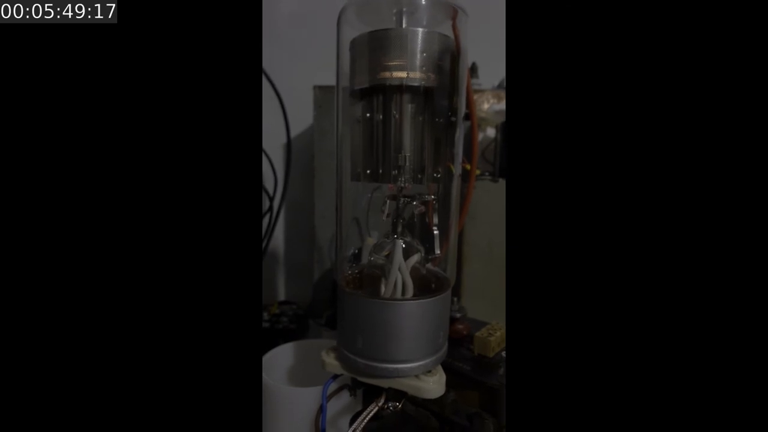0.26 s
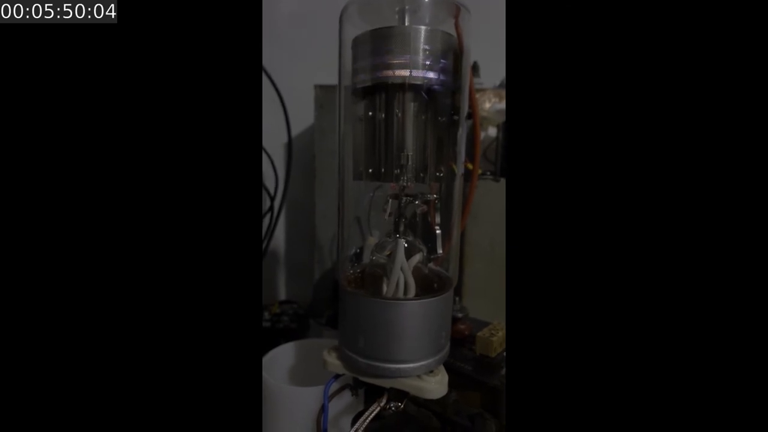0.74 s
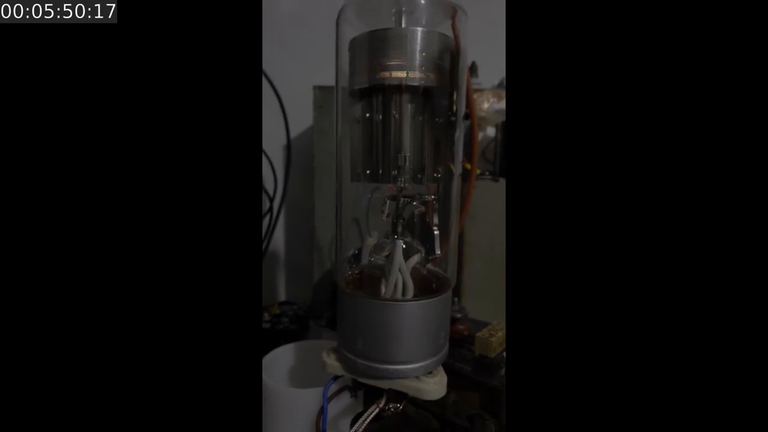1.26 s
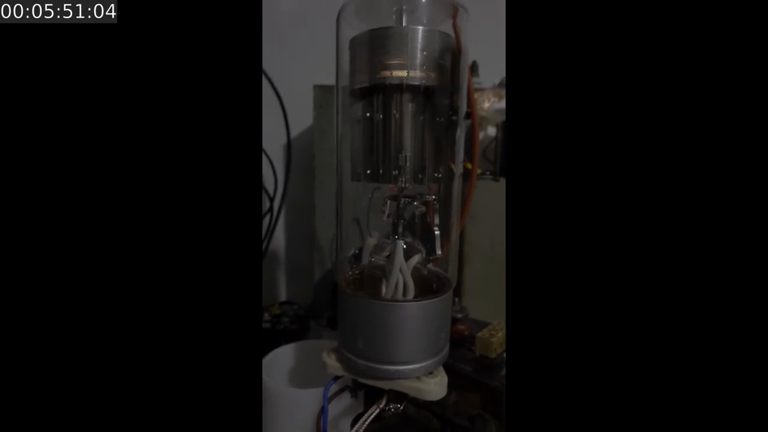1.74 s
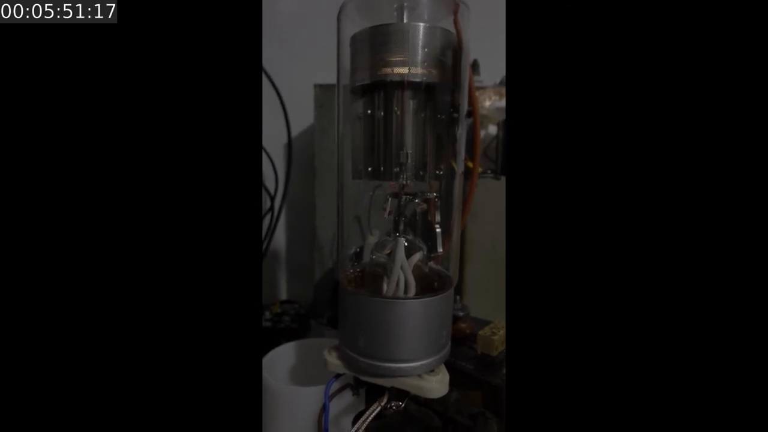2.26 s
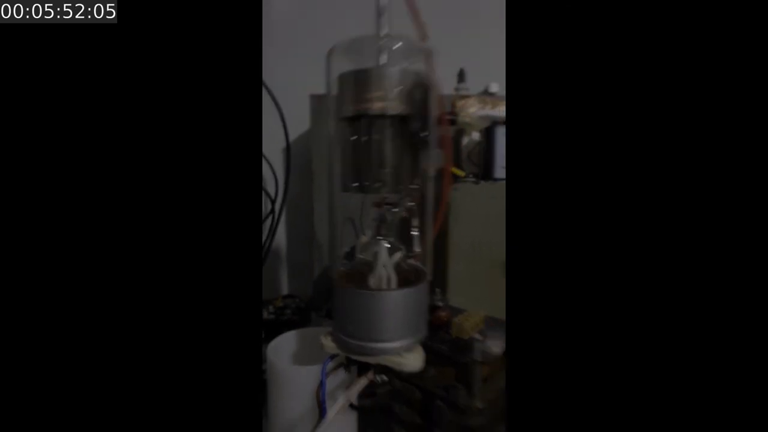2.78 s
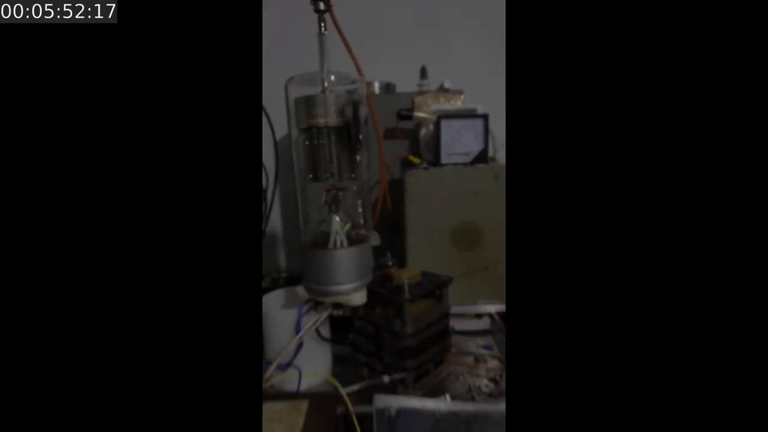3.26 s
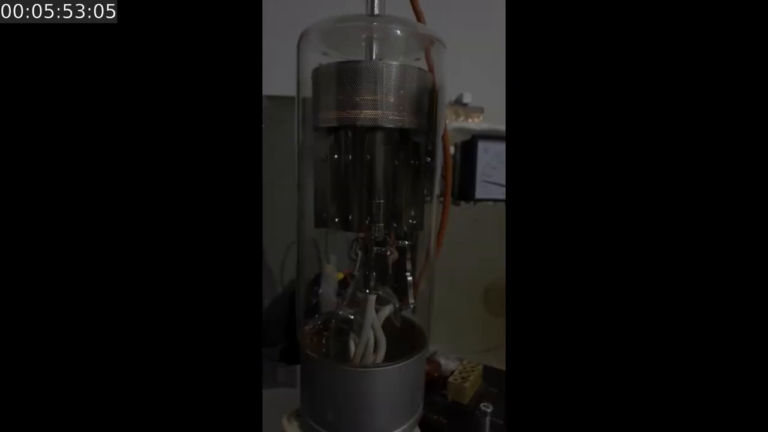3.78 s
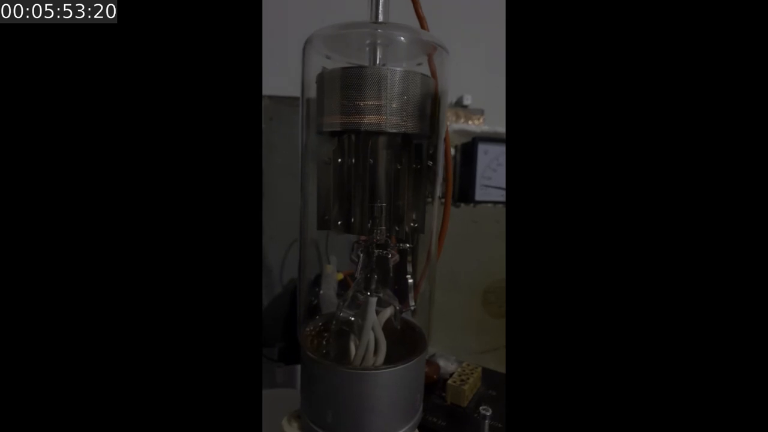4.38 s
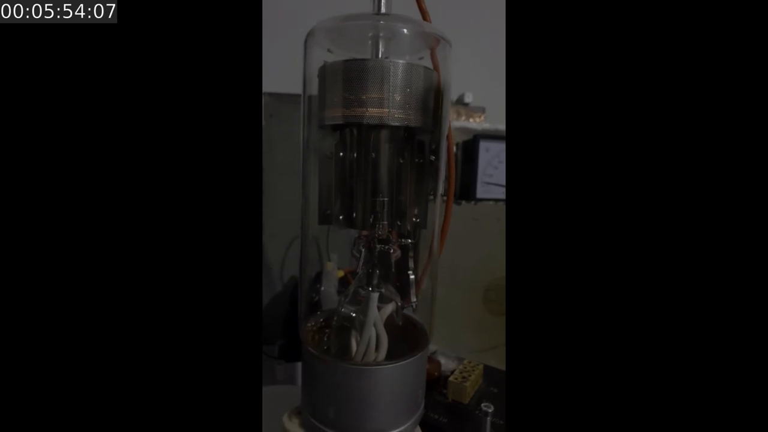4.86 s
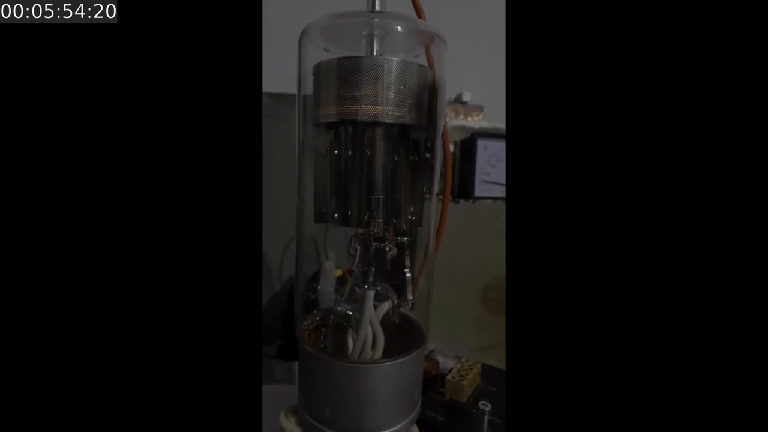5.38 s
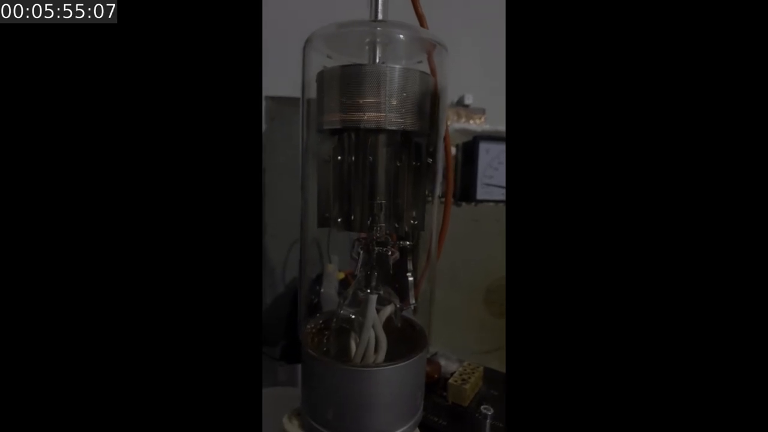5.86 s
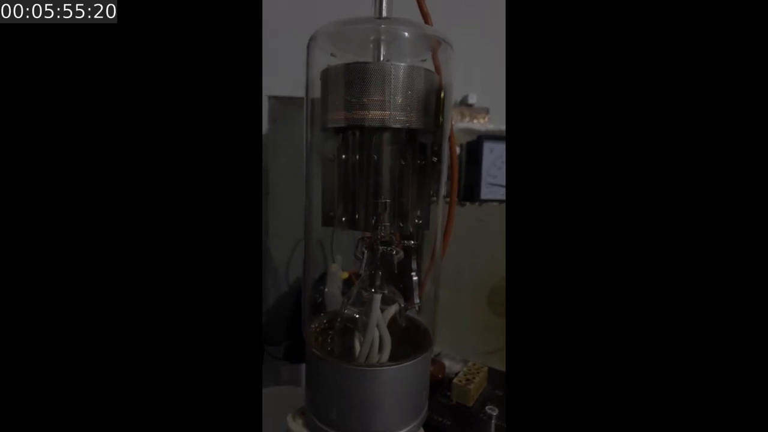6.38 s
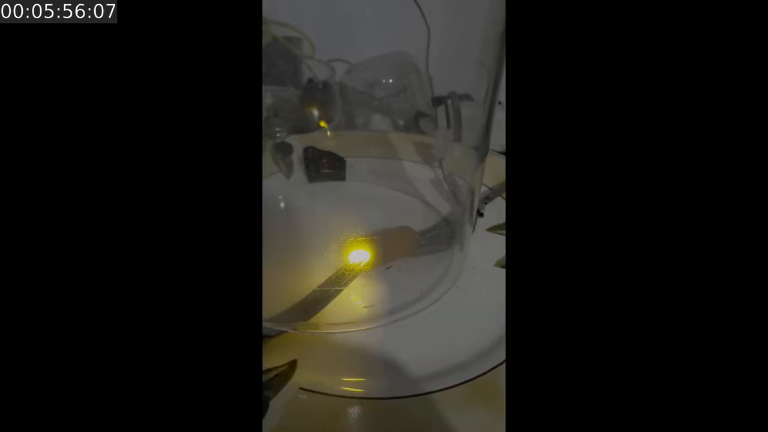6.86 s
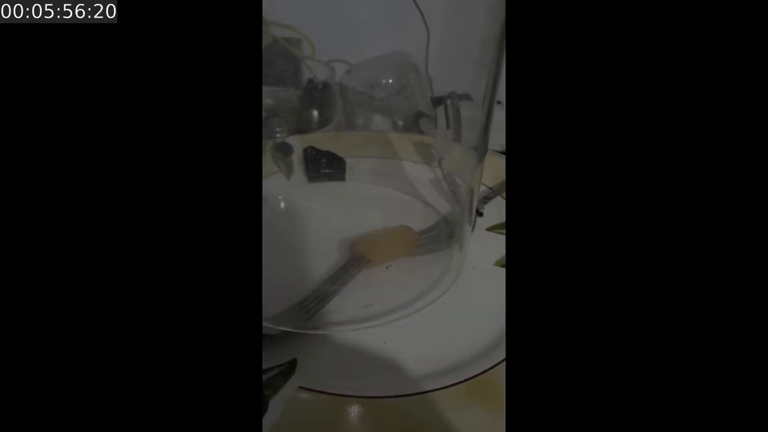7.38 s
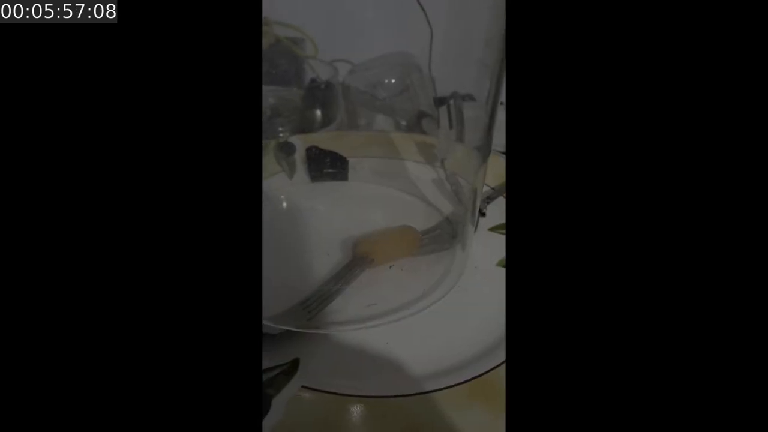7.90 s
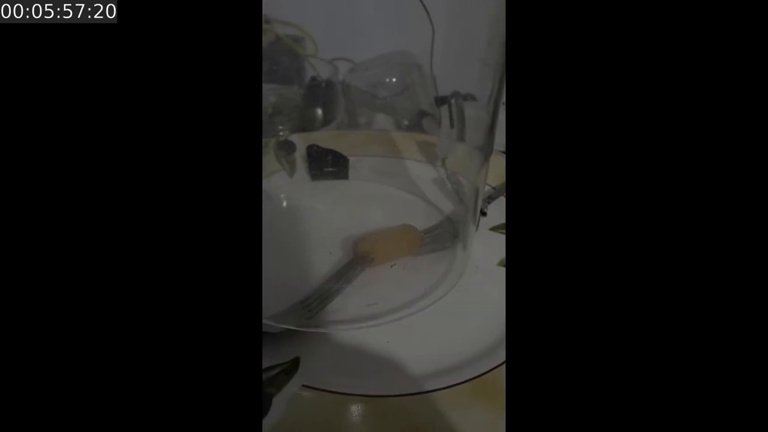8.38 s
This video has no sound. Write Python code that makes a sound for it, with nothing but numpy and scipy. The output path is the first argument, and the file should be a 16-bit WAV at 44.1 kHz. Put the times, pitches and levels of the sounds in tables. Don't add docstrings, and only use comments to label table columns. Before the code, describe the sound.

Steady fan hiss and transformer hum with wind buffeting and finger knocks on a handheld phone, broken by two sharp electric snaps after level drops.

```python
import sys
import numpy as np
from scipy import signal
from scipy.fft import rfft, irfft
from scipy.io import wavfile
from scipy.ndimage import uniform_filter1d

SR = 44100
rng = np.random.default_rng(int(sys.argv[2]) if len(sys.argv) > 2 else 0)


def digitize_waveform(pressure):
    field = np.atleast_2d(pressure).T
    bounded = np.clip(field, -1, 1)
    quanta = np.round(bounded * 32767).astype(np.int16)
    wavfile.write(sys.argv[1], SR, quanta)


def field_ratio(decibels):
    return 10 ** (np.asarray(decibels, dtype=float) / 20)


N = 381024

# (start [s], end [s], place [index])
STANDS = [
    (0, 2.72, 0),
    (2.72, 3.397, 2),
    (3.431, 6.349, 1),
    (6.4315, 9, 2),
]
# (time [s], colour [index], left [dB], right [dB], crackle [ms], tilt of the crack [dB per octave])
SNAPS = [
    (4.0719, 0, -28.5, -29, 10.6, -5),
    (6.8519, 1, -22.5, -32, 11, 0.5),
]
SLIP_START_S, SLIP_END_S = 2.9445, 2.972


def over_hz(table, hz, column):
    rows = np.array(table, float)
    return np.interp(np.log(hz + 1), np.log(rows[:, 0]), rows[:, column])


def unit(x):
    return x / np.sqrt(np.mean(x ** 2))


def walk(rate):
    k = int(SR / rate)
    steps = np.repeat(rng.standard_normal(N // k + 1), k)
    return unit(uniform_filter1d(uniform_filter1d(steps, k), k)[:N])


def bell(s, ms):
    coarse_t = np.arange(0, N, 16) / SR
    return np.repeat(np.exp(-((coarse_t - s) * 2000 / ms) ** 2), 16)[:N]


def port_gains(db, pan_db):
    return field_ratio(db) * np.array([[field_ratio(pan_db)], [1]]) / np.sqrt(1 + field_ratio(2 * pan_db))


def causal(table, tilt_db, size=4096):
    hz = np.arange(size // 2 + 1) * SR / size
    colour_db = over_hz(table, hz, column=1) + tilt_db * np.log2(hz / 1000 + 0.095)
    cep = irfft(np.log(field_ratio(colour_db)))
    cep[1:size // 2] *= 2
    cep[size // 2 + 1:] = 0
    h = irfft(np.exp(rfft(cep)))[:size // 4]
    return h / np.sqrt(np.sum(h ** 2))


def ring(hz, t60, size):
    t = np.arange(size) / SR
    return np.sin(2 * np.pi * hz * t) * np.exp(-np.log(1000) * t / t60)


def add(out, s, x):
    i = int(s * SR)
    out[..., i:i + x.shape[-1]] += x


def gain_db():
    # (held [dB], creep after the discharge [dB per s], lets go [s], recovery [s], full [dB])
    gain = [
        (-37, 0, 1.2, 1, -36.5),
        (-42.5, 3.5, 2.6, 0.22, -39.5),
        (-64.5, 21, 4.366, 0.34, -39),
        (-72, 5.5, 7.5, 0.41, -41.5),
    ]
    t, out = np.arange(N) / SR, np.zeros(N)
    for (start, end, _), (held_db, creep, go_s, ease_s, full_db) in zip(STANDS, gain):
        snap_s = max(row[0] for row in [(0,)] + SNAPS if row[0] < end)
        low_db = held_db + creep * np.clip(np.minimum(t, go_s) - snap_s, 0, None)
        eased_db = full_db + (low_db - full_db) * np.exp(-np.clip(t - go_s, 0, None) / ease_s)
        out[t >= start] = eased_db[t >= start]
    return out


def air():
    band = signal.butter(2, (8200, 10100), "bandpass", fs=SR, output="sos")
    hiss = signal.sosfilt(band, rng.standard_normal((2, N)))
    over_gain_db, top_db, right_db = -18, -79, -24
    level_db = np.minimum(over_gain_db + gain_db(), top_db)
    return field_ratio(level_db + [[0], [right_db]]) * unit(hiss)


def bench(place):
    # (frequency [Hz], level [dB per Hz])
    left = [
        [(130, 13), (930, 6), (1100, 13), (1240, 0), (1650, 4.5), (1850, 2.5), (4670, 2.5), (5880, -2),
         (7410, -17.5), (8810, -6.5), (11770, -24), (13300, -41.5), (14000, -61.5), (16000, -68)],
        [(130, 9), (580, 12), (780, 1.5), (1100, 9.5), (1240, 0.5), (1650, 2), (1960, -3), (2470, 6),
         (3300, -7), (4670, -6.5), (8320, -21.5), (11110, -19.5), (13500, -36), (14400, -37), (16000, -62)],
        [(130, 20.5), (290, 14), (520, 13), (580, 2.5), (980, 14), (1310, 3), (1470, 4), (5550, 1.5),
         (7410, -17.5), (8810, -6), (11770, -24), (13500, -40), (16000, -55)],
    ]
    right = [
        [(130, 15.5), (580, 11.5), (780, -11), (980, 4), (1750, 3), (3710, -11), (4410, -12.5), (5240, -10.5),
         (9340, -41.5), (10480, -20.5), (11770, -21), (13300, -38), (14000, -57.5), (16000, -64)],
        [(130, 9.5), (580, 14.5), (780, -15), (1040, 11), (1240, -1.5), (1750, 3), (1850, -9), (2470, 7),
         (3300, -15.5), (5550, -11.5), (9340, -36), (11110, -18.5), (13500, -45), (14400, -46), (16000, -65)],
        [(130, 20.5), (280, 17.5), (690, 7), (780, -20), (980, 8.5), (2200, 3.5), (3710, -10.5), (4410, -6.5),
         (5880, -10), (9340, -40.5), (11110, -16), (13500, -46), (16000, -55)],
    ]
    # (frequency [Hz], likeness [0-1], left leads [rad])
    shared = [
        [(130, .95, .2), (300, .98, .25), (430, .95, .7), (540, .9, 1.15), (645, .75, 1.9), (860, .65, -.9),
         (1075, .5, -1.5), (1500, .72, -.4), (2150, .6, .1), (3000, .35, -.5), (8600, 0, 0), (10750, .8, 0)],
        [(200, .6, 0), (300, .8, .2), (430, .92, .75), (540, .9, 1.1), (645, .85, 2), (860, .8, 4.9),
         (1075, .7, 5), (1500, .68, 5.3), (2150, .8, 6.25), (3000, .4, 7.5), (8600, .3, 6.3), (10750, .6, 6.3)],
        [(130, .95, .1), (300, .98, .4), (430, .88, .9), (645, .78, 2.2), (860, .6, 3.6), (1075, .35, 3.9),
         (1500, .45, 6), (2150, .3, 6.3), (4300, .3, 4.2), (8600, .2, 4.2), (10750, .5, 6)],
    ][place]
    # (frequency [Hz], level over the hiss [dB])
    hum_lines = [
        [(150.5, -9.5), (188.4, -7.5), (277, -8.5), (298.8, -5), (376.8, -11.5), (476.4, -6.5), (1003, -20),
         (1055, -19.5)],
        [(298.8, -7), (376.8, -8.5), (477, -7.5), (1055, -17)],
        [(250, -6), (298.8, -3), (376.8, -6), (463, -9.5)],
    ][place]
    # (frequency [Hz], width [Hz], level [dB])
    ducts = [(195.5, 41, 6), (260, 7, 5), (392, 142, -8), (489, 185, 7.5), (679, 46, 4.5), (886, 25, 6),
             (1638, 120, 6.5), (1798, 15, 7), (2308, 47, 6.5)]
    t, hz = np.arange(N) / SR, np.arange(N // 2 + 1) * SR / N
    like = np.clip(over_hz(shared, hz, column=1), 0, 1)
    lag = np.exp(-1j * over_hz(shared, hz, column=2))
    ducts_db = sum(db / (1 + (2 * (hz - f) / width) ** 2) for f, width, db in ducts)
    colours_db = [over_hz(side[place], hz, column=1) + ducts_db for side in (left, right)]
    colours = field_ratio(colours_db) * hz ** 2 / (hz ** 2 + 110 ** 2)
    a, b = (rfft(rng.standard_normal(N) * field_ratio(0.79 * walk(9))) for _ in range(2))
    hiss = colours * [a, like * lag * a + np.sqrt(1 - like ** 2) * b]
    band = (hz > 700) & (hz < 6000)
    hiss = irfft(hiss, N) / np.std(irfft(hiss.mean(axis=0) * band, N))
    hum = np.zeros(N)
    for f, db in hum_lines:
        hum += field_ratio(db + 2.0 * walk(5)) * np.sin(2 * np.pi * f * t + 1.0 * walk(8))
    return hiss + np.sqrt(2) * irfft(rfft(hum) * np.array([np.ones(len(hz)), lag]), N)


def shaded(x):
    # (from [s], until [s], frequency [Hz], left [dB], right [dB])
    shades = [(2.72, 3.396, 690, 2, 1), (2.718, 3.4, 864, -9, 9.5), (2.72, 3.405, 2240, 1.5, -3),
              (2.72, 3.4, 3200, 2.5, -11), (2.72, 3.4, 5000, 1.5, -3), (3.43, 4.4, 780, -3, -3),
              (3.43, 4.6, 2700, -7, -4), (3.43, 4.6, 3500, -9, -13), (3.43, 4.6, 4000, -3, -6),
              (4.6, 6.36, 3600, -5.5, 0), (5.597, 6.36, 3050, 1, 3), (5.6, 6.357, 4100, 1, 4),
              (5.597, 6.36, 5260, -2.5, -11), (6.42, 7.5, 3500, -2, -14), (7.5, 8.7, 3500, 0.5, -2),
              (6.42, 8.703, 4480, -1, 3), (3.4, 4.25, 7350, -12, -6), (4.25, 4.65, 7350, -5, -6),
              (4.15, 4.6, 8300, 4, 0), (4.15, 4.6, 9600, 5, 0), (4.15, 4.6, 6300, 4, 0),
              (3.4, 4.6, 8900, 3, 0), (3.4, 4.55, 11300, -6, -4), (3.4, 4.55, 12500, -8, -6),
              (6.4, 7.7, 7400, -9, -3), (6.4, 7.7, 10600, -4, -3), (6.4, 7.7, 12000, -8, -8),
              (6.4, 8.7, 525, -8, -6), (6.4, 8.7, 630, 3, 4), (6.4, 8.7, 3650, 0, -7),
              (7.55, 8.7, 2500, 3, 2), (6.4, 7.6, 300, -3, -3), (6.9, 7.55, 2300, -4, -4),
              (7.55, 8.7, 440, 3, 3), (4.5, 5.1, 3500, -4, -4), (1.1, 1.3, 9000, 3, 3),
              (2.6, 2.9, 280, -4, -4), (2.6, 2.9, 550, 3, 3), (1.4, 1.7, 195, -5, -5),
              (5.55, 5.9, 200, 5, 5)]
    sharpness, ease_s = 9.3, 0.051
    out = x.copy()
    for start, end, hz, left_db, right_db in shades:
        span = slice(int(start * SR), int(end * SR))
        band = signal.lfilter(*signal.iirpeak(hz, sharpness, fs=SR), x[:, span])
        t = np.arange(band.shape[1]) / SR
        fade = np.clip(np.minimum(t, end - start - t) / ease_s, 0, 1)
        out[:, span] += (field_ratio([[left_db], [right_db]]) - 1) * band * fade
    return out


def draught():
    # (frequency [Hz], level [dB])
    eddy_colour = [(20, -20), (40, -1.5), (58, -1), (90, -7), (150, -22.5), (300, -31), (700, -46.5),
                   (2000, -86)]
    opposed = [0, 0, .45, 0]
    # (level over the hiss [dB], left minus right [dB])
    breezes = [
        (1, 4),
        (-3.5, -24),
        (7, -1),
        (5.5, -9.5),
    ]
    # (time [s], level over the hiss [dB], left minus right [dB], length [ms])
    gusts = [(0.45, -10, 15, 130), (0.68, 0, -4, 34), (0.81, 0, -11, 60), (0.95, 10, 22, 123),
             (1.21, -5, 10, 130), (1.92, 12, 22, 43), (2.37, -1, 0, 87), (2.49, -10, -1, 47),
             (2.68, 5.5, -8, 66), (3.0, -4, -17, 48), (3.1, 1, -4, 74), (3.21, 8, -24, 39),
             (3.84, 4, 3, 130), (4.07, 2, -8, 110), (4.44, 8, -8, 47), (4.58, 13, -5, 100),
             (4.81, 14, -8, 57), (5.03, 2, -19, 180), (5.12, 17, -5, 43), (5.22, 10, 1, 51),
             (5.31, 13, -21, 47), (5.48, 17, -2, 97), (5.76, 3, 15, 88), (5.929, 5, -11, 32),
             (6.24, -5, 9, 110), (6.99, 5, -16, 39), (7.57, 9.5, -24.5, 42), (8.11, 3, -10, 30),
             (8.44, -1, -4, 100), (8.59, 7, -19, 60)]
    # (time [s], length [ms], left [dB], right [dB])
    lulls = [
        (5.61, 80, -9, -3),
        (6.3, 200, -5, -5),
        (2.96, 60, -8, -4),
    ]
    hz, t = np.arange(N // 2 + 1) * SR / N, np.arange(N) / SR
    spectrum = rfft(rng.standard_normal((2, N))) * field_ratio(over_hz(eddy_colour, hz, column=1))
    eddies = irfft(spectrum, N)
    eddies = unit(eddies / uniform_filter1d(eddies ** 2, int(0.056 * SR)) ** 0.33)
    share = sum(k * (t >= start) * (t < end) for (start, end, _), k in zip(STANDS, opposed))
    eddies = np.array([eddies[0], np.sqrt(1 - share ** 2) * eddies[1] - share * eddies[0]])
    push = np.zeros((2, N))
    for (start, end, _), (db, pan_db) in zip(STANDS, breezes):
        dying = np.clip((end - t) / 0.05, 0, 1)
        push += port_gains(db, pan_db) * (t >= start) * dying
    for s, db, pan_db, ms in gusts:
        push += port_gains(db, pan_db) * bell(s, ms)
    lull_db = sum(np.array([[left_db], [right_db]]) * bell(s, ms) for s, ms, left_db, right_db in lulls)
    return 2 * eddies * field_ratio(lull_db) * push


def puffs():
    # (time [s], left [dB], right [dB], length [ms])
    fronts = [(1.17, -28, -41, 14), (1.93, -47, -45, 12), (4.44, -45, -60, 12), (4.55, -46, -52, 16),
              (4.74, -36, -43, 36), (4.99, -31, -38, 19), (5.081, -31.5, -47.5, 15), (5.3, -67, -38, 30),
              (5.35, -39, -47, 15), (5.83, -33, -45, 28), (5.612, -25, -40, 45)]
    t = np.arange(0, N, 32) / SR
    swell = np.zeros((2, len(t)))
    for s, left_db, right_db, ms in fronts:
        swell += field_ratio([[left_db], [right_db]]) * np.exp(-((t - s) * 2000 / ms) ** 2)
    swell = uniform_filter1d(np.repeat(swell, 32, axis=1)[:, :N], size=32)
    band = signal.butter(2, [120, 550], "bandpass", fs=SR, output="sos")
    return swell * unit(signal.sosfilt(band, rng.standard_normal((2, N))))


def finger_slip():
    level_db, from_hz, to_hz = -15, 230, 470
    size = int((SLIP_END_S - SLIP_START_S) * SR)
    rate = np.linspace(from_hz, to_hz, size) * (1 + 0.2 * walk(275)[:size])
    phase = 2 * np.pi * np.cumsum(rate) / SR
    level = signal.windows.tukey(size, .2) * field_ratio(level_db + 1.6 * walk(270)[:size])
    return -level * (np.sin(phase) + 0.27 * np.sin(2 * phase))


def fingers():
    # (time [s], right [dB], left [dB], ring [Hz], t60 [ms])
    taps = [(1.171, -23, -23, 6397, 6.3), (0.419, -10, -24, 2704, 3.3), (1.044, -21, -42, 1250, 12),
            (1.1706, 0, -10.5, 2450, 5.5), (1.1713, -27, -42, 12520, 10), (1.1716, -20, -16, 3300, 3),
            (1.233, -19, -40.5, 1244, 14), (1.518, -20, -39.5, 1203, 13), (1.68085, -2, -10, -2350, 2.8),
            (1.6967, -14, -38, 1300, 5.7), (1.7198, -18, -39, 1600, 12), (2.9702, -8.5, -52, -96, 100),
            (2.978, -9, -45, 300, 14), (2.976, -27, -45, 1800, 25), (2.983, -25, -45, 1650, 20),
            (2.983, -23, -45, 1130, 20), (3.3466, 4.5, -38, 256, 8.6), (3.3468, -2.5, -29, 1444, 3.6),
            (3.3468, -9, -37, 3899, 3.5), (3.3473, -4.5, -11, 701, 4), (3.3491, 0, -58, -104, 75),
            (5.255, -24, -40, 900, 11), (5.6094, -32, -20, 800, 5.8), (5.6065, -39, -6, 452, 6.5),
            (5.6101, -5, -39, 330, 13), (5.619, -9.5, -50, -100, 57), (1.17135, -7, -17, 2800, 3),
            (1.171, -29, -29, 8800, 7), (1.1708, -22, -28, 1670, 8), (1.1707, -25, -28, 10300, 3),
            (1.1708, -27, -30, 4300, 3), (1.171, -36, -40, 14500, 5), (1.6812, -34, -46, 12500, 6),
            (1.681, -46, -48, 14800, 5), (5.6101, -11, -40, 620, 5), (2.9456, -13, -45, -520, 6),
            (2.9582, -9, -45, 560, 7), (3.3468, -26, -40, 10500, 3)]
    out, size = np.zeros((2, N)), SR // 10
    t = np.arange(size) / SR
    sag = 0.036 * (1 - np.exp(-t / 0.038)) / (t + 1e-9)
    stiffen = 0.081 * np.minimum(t * 1000, 2)
    yielding = 1 - np.exp(-t * 1000 / 0.29)
    skin = signal.butter(4, 9500, fs=SR, output="sos")
    for s, right_db, left_db, hz, t60_ms in taps:
        edge_db = -27 + 7 * np.log2(abs(hz) / 2000)
        burst = rng.standard_normal(size) * np.exp(-t / 0.00055)
        edge = signal.sosfilt(skin, field_ratio(edge_db) * signal.lfilter([1], [1, -1, .35], burst))
        bend = sag if abs(hz) < 500 else 1 + stiffen * (t60_ms < 6)
        case = ring(hz * bend, t60_ms / 1000, size) * yielding
        add(out, s, field_ratio([[left_db], [right_db]]) * (case + edge))
    add(out[1], SLIP_START_S, finger_slip())
    return out


def arc_noise(t, crackle_ms, again):
    arc = (.5 + 1.2 * np.exp(-t / 0.0009)) * rng.standard_normal(len(t))
    arc /= 1 + (t * 1000 / crackle_ms) ** 6
    arc[:8] += 1.5 * np.hanning(8)
    for ms, again_db in again:
        add(arc, ms / 1000, field_ratio(again_db) * np.hanning(6))
    return arc


def snaps():
    # (frequency [Hz], level [dB], t60 [s], right minus left [dB])
    snap_modes = [
        [(600, -10, 0.12, 1), (1572, -17, 0.3, 2), (1680, -1, .035, 2), (2290, -5, .04, 0),
         (2470, -10, 0.12, 0), (1100, -28, .05, 0), (4100, -25, .15, 3), (5690, -22, 0.15, 0),
         (6400, -20, 0.11, 1), (10700, -18, .12, 0), (12160, -24, .12, 0)],
        [(600, -8, .035, 3), (1583, -28, .32, 5), (2270, -8, 0.03, 2), (2487, -25, .13, 3),
         (3230, -6, .022, -5), (3270, -27, 0.2, -3), (4140, -20, .1, 0), (4840, -6, .022, -9),
         (5470, -5, .03, -9), (5486, -31, .25, 0), (6500, -12, .03, -5), (9458, -22, .08, -15),
         (10770, -23, .1, 8), (8856, -25, .15, -8)],
    ]
    # (frequency [Hz], level [dB])
    snap_colour = [
        [[(200, -20), (400, -10), (610, 1), (760, -16), (980, -29), (1600, -2.5), (1970, -6), (2600, -4.5),
         (3680, -15), (5970, -5.5), (7350, -18.5), (11140, -12), (14700, -23)], [(200, -15), (320, -1.5),
         (630, 3), (780, -24), (900, -26), (1710, -0.5), (1970, -14.5), (2430, 0.5), (3680, -21), (5570, -8),
         (9050, -24), (11140, -12), (14700, -27)]],
        [[(200, -17), (420, -17), (640, 1), (1150, -29), (1390, -9), (1620, 3), (2110, -18), (2800, -12),
         (3200, -1), (5970, -6), (7350, -24), (9050, -4.5), (14700, -21)], [(200, 1), (330, 7), (450, 1),
         (630, 10), (860, -14), (1300, -19), (1600, -3), (1900, -6), (2500, 5), (3200, -11), (3680, -14),
         (5200, -1), (9300, -40), (11140, -3), (14700, -14)]],
    ]
    # (time after the breakdown [ms], level [dB])
    later_pulses = [
        [(1.8, 3), (2.6, 1), (5.4, 7), (7.4, 5), (22, 3), (24, 2)],
        [(.7, 5), (1.9, -2), (5.6, -3), (7.1, 5), (8.8, 4), (10.8, 6)],
    ]
    room_t60_s, room_level_db = [0.26, 0.32], [-2, -17]
    shaken_level_db = [-5, -7]
    strike_db = 22.5
    out, size = np.zeros((2, N)), SR // 2
    t = np.arange(size) / SR
    rows = zip(SNAPS, snap_modes, room_level_db, room_t60_s, shaken_level_db, later_pulses)
    for (s, which, *db, crackle_ms, tilt_db), modes, room_db, room_s, shaken_db, again in rows:
        arc = arc_noise(t, crackle_ms, again)
        for port, right, port_db, colour in zip(out, range(2), db, snap_colour[int(which)]):
            echoes = field_ratio(room_db + 1.1 * walk(150)[:size]) * rng.standard_normal(size)
            room = echoes * np.exp(-np.log(1000) * t / room_s) * (1 - np.exp(-t / .006))
            metal = 0.061 * sum(field_ratio(g + right * lean_db) * ring(f, t60, size) for f, g, t60, lean_db in modes)
            shaken = signal.fftconvolve(room, unit(metal) / np.sqrt(size))[:size]
            struck = field_ratio(strike_db) * metal + field_ratio(shaken_db) * shaken
            metal[:1024] += causal(colour, tilt_db)
            crackle = signal.fftconvolve(arc, metal)[:size]
            answer = signal.fftconvolve(room, causal(colour, 0))[:size]
            add(port, s, field_ratio(port_db) * (struck + crackle + answer))
    return out


def scene():
    t, places = np.arange(N) / SR, [bench(k) for k in range(3)]
    heard = np.zeros((2, N))
    for start, end, k in STANDS:
        heard += places[k] * uniform_filter1d(1. * ((t >= start) & (t < end)), size=100)
    heard = shaded(heard) * field_ratio(6 * bell(SLIP_END_S, 2000 * 0.023))
    level_db = gain_db() - 4 * bell(3.385, 60)
    return (heard + draught()) * field_ratio(level_db) + snaps() + fingers() + puffs() + air()


def low_pass(x):
    return signal.sosfilt(signal.butter(12, 16500, fs=SR, output="sos"), x)


def record(dry):
    t, out = np.arange(N) / SR, dry.copy()
    leftover = signal.butter(2, 3500, fs=SR)
    for (_, end, _), (start, _, _), tail_db in zip(STANDS[1:], STANDS[2:], [-33, -46]):
        gap = np.flatnonzero((t >= end) & (t < start))
        out[:, gap[0] - 88:gap[0]] *= np.linspace(1, 0, 88)
        tail = signal.lfilter(*leftover, dry[:, gap - len(gap)])
        out[:, gap] = field_ratio(tail_db) * tail * np.exp((end - t[gap]) / .007)
    knee = .7
    rounded = np.sign(out) * (knee + .3 * np.tanh((abs(out) - knee) / .3))
    out = np.where(abs(out) > knee, rounded, out)
    top_cut = signal.ellip(12, .2, 70, 15600, fs=SR, output="sos")
    return low_pass(np.clip(signal.sosfilt(top_cut, out), -1, 1))


dry = scene()
out = record(dry)
digitize_waveform(out)
```